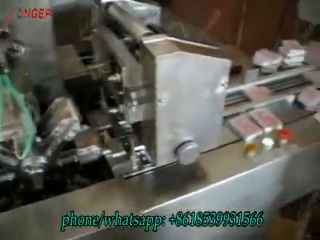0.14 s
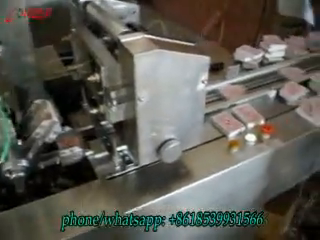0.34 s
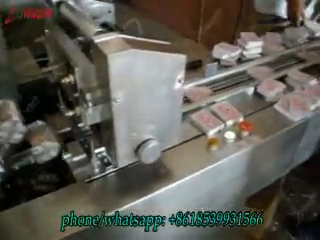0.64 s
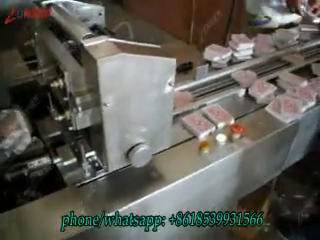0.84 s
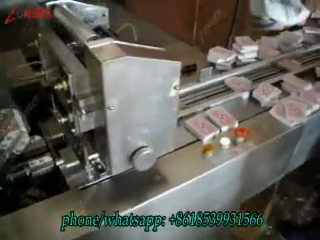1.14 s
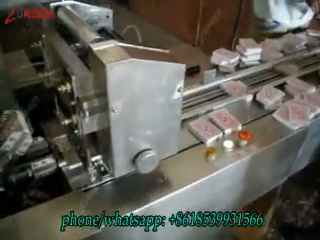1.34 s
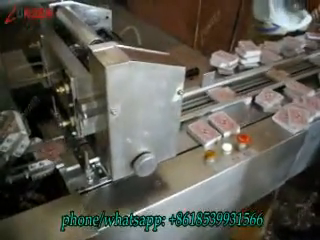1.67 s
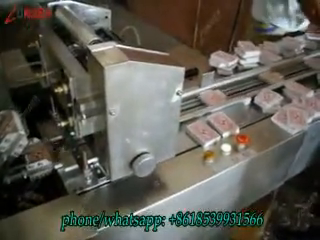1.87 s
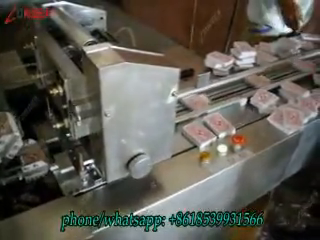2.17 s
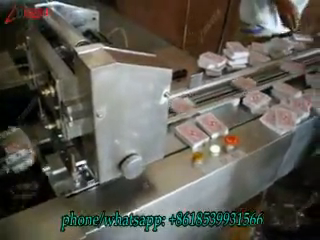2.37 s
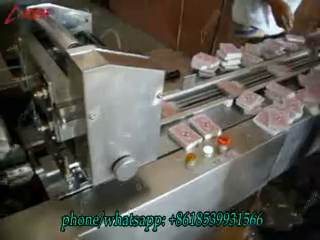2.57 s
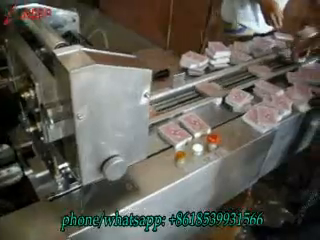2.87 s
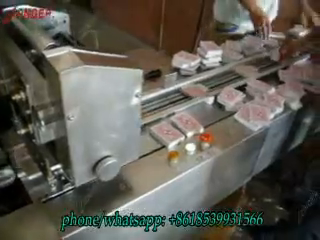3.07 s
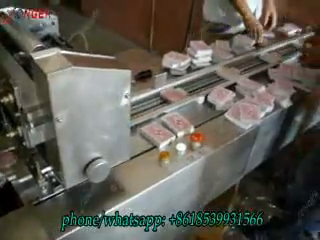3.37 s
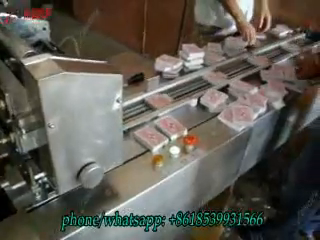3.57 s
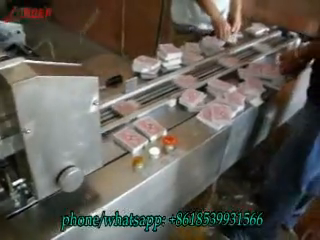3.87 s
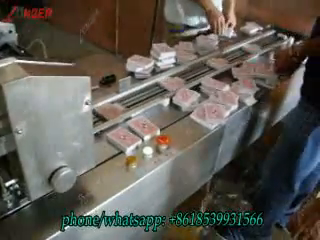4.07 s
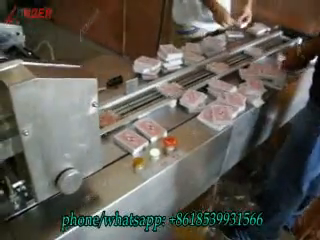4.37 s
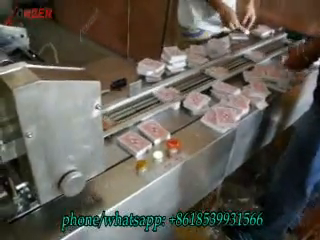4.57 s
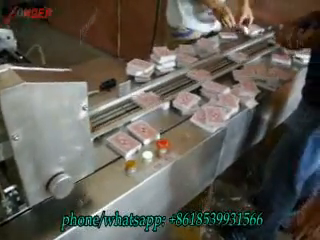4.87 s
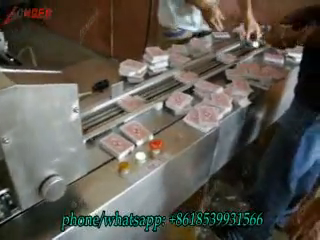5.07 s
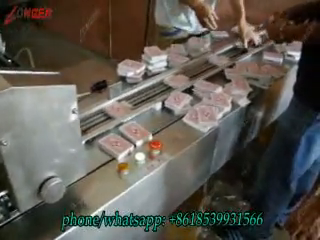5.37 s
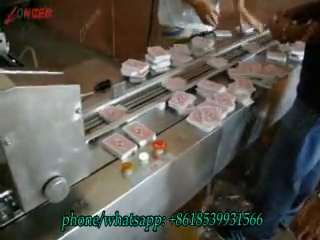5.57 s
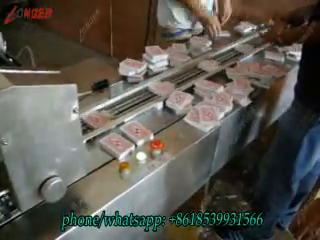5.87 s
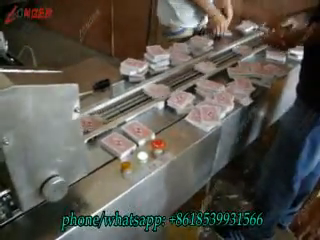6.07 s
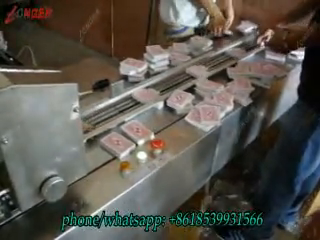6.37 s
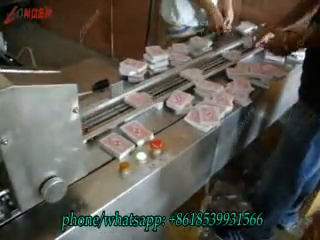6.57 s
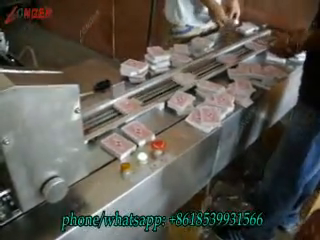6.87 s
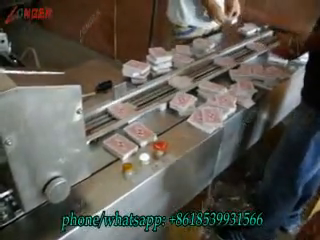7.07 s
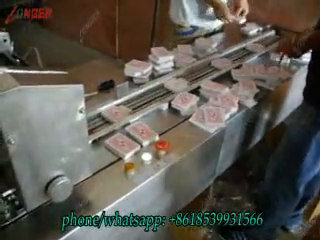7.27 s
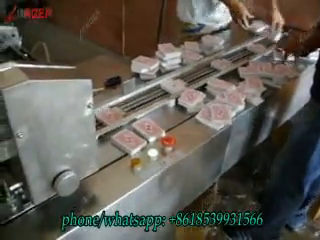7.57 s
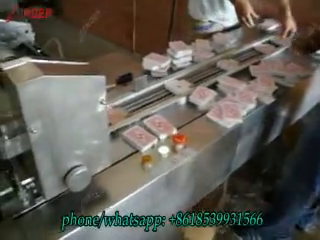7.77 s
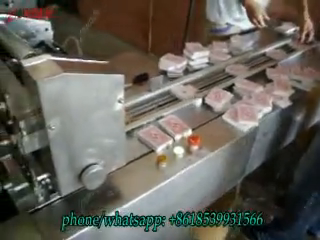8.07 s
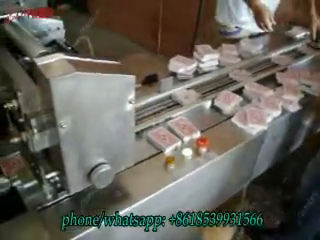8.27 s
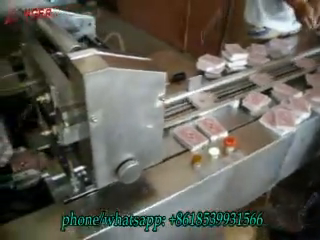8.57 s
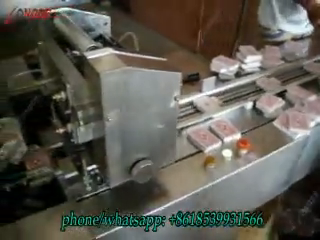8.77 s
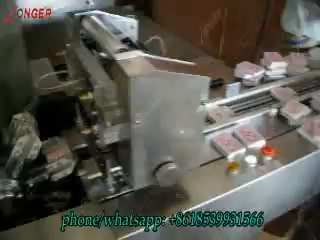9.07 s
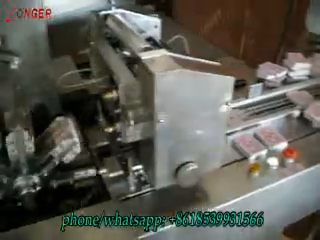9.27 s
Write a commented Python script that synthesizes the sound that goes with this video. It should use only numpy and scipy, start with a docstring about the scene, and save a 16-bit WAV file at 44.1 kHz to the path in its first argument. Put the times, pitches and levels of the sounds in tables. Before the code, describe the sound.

Over a steady motor drone, a card-packing machine ticks, crunches film and clacks in cycles, then loud knocks shake its metal housing.

```python
"""Card-wrapping machine

An automatic machine wraps decks of cards in a workshop, one pack about every 1.7 s. Over the rumble
of the drive and the rattle of the chain, the linkage ticks, film crunches in the jaws and a steel
lever clacks home. Later a heavy knock shakes the sheet-metal housing once a cycle and overloads a
close, narrow-band microphone."""
import sys
import numpy as np
from scipy import signal
from scipy.fft import rfft, irfft, next_fast_len
from scipy.io import wavfile

SR = 44100
rng = np.random.default_rng(int(sys.argv[2]) if len(sys.argv) > 2 else 0)


def generate_wav(sig):
    """Save sig (samples, or channels by samples) to the path in sys.argv[1] as 16-bit PCM at SR."""
    pcm = np.round(np.clip(np.atleast_2d(sig).T, -1, 1) * 32767).astype(np.int16)
    wavfile.write(sys.argv[1], SR, pcm)


N = 416295
TIME = np.arange(N) / SR
AGE = TIME[:SR]  # seconds since a hit; every one-shot lasts 1 s


def undb(db):
    """Decibels to gain."""
    return 10 ** (np.asarray(db) / 20)


def unit(x):
    """Scale to rms 1."""
    return x / np.sqrt(np.mean(x ** 2))


def noise(spectrum, size):
    """Noise shaped by an EQ curve of (Hz, dB) points on a log-frequency axis, rms 1."""
    hz = np.fft.rfftfreq(size, 1 / SR)
    point_hz, point_db = np.transpose(spectrum)
    curve_db = np.interp(np.log(hz + 1e-3), np.log(point_hz), point_db)
    return unit(irfft(rfft(rng.standard_normal(size)) * undb(curve_db), size))


def band(centre_hz, width_hz, size):
    """Noise in one steep-sided resonance, rms 1."""
    hz = np.fft.rfftfreq(size, 1 / SR)
    rolloff = 1 + (2 * (hz - centre_hz) / width_hz) ** 4
    return unit(irfft(rfft(rng.standard_normal(size)) / rolloff, size))


def wander(rate_hz):
    """Random modulation that glides between values with a spread of 1."""
    knots = np.arange(0, TIME[-1] + 1, 1 / rate_hz)
    return np.interp(TIME, knots, rng.standard_normal(1024)[:len(knots)])


def attack(rise_s):
    """Soft onset: vibration takes a moment to spread through a part."""
    return 1 - np.exp(-AGE / rise_s)


def fade(t60):
    """Exponential decay, 60 dB down after t60 seconds."""
    return np.exp(-np.log(1000) * AGE / t60)


def ring(modes, scatter_db, detune):
    """A struck object: decaying sines whose levels and pitches vary from hit to hit."""
    chance = rng.standard_normal((len(modes), 2))
    return sum(undb(db + scatter_db * a) * fade(t60) * np.sin(2 * np.pi * hz * (1 + detune * b) * AGE)
               for (hz, db, t60), (a, b) in zip(modes, chance))


def crackle(per_second, cap_db, size):
    """Random impulses, mostly small with a few strong ones."""
    fires = rng.random(size) < per_second / SR
    return fires * undb(np.minimum(4 * rng.exponential(size=size), cap_db))


def add(track, start, sound):
    """Mix a sound into the track at a time in seconds."""
    i = int(start * SR)
    track[i:i + len(sound)] += sound[:N - i]


# Tone of the running drive: (frequency [Hz], level [dB])
DRIVE_SPECTRUM = [(11, -30), (18, 4.5), (53, -4.5), (71, -7.5), (151, -3.5), (195, -7), (270, -3.5),
                  (382, -9), (429, -8), (482, -8), (900, -11), (1570, -22.5), (2800, -22), (3690, -31),
                  (4550, -37), (5920, -71), (10000, -120)]
# Resonances the drive keeps ringing: (centre [Hz], width [Hz], level [dB])
HUM_BANDS = [(94, 6.6, -52), (157, 26, -46), (436.6, 24, -43), (860, 270, -37), (1093, 200, -41),
             (2320, 640, -49.5)]
# Fader curve of the housing's drone, strongest near the start: (time [s], level [dB])
DRONE_CURVE = [(0, 3), (.7, 10), (1.3, -3.5), (9.4, -1)]


def drive():
    """Motor and gears rumble and whirr in flickering octave bands and keep frame and housing humming."""
    rumble_db, whirr_db = -26.5, -27.5
    size = next_fast_len(N, real=True)
    spectrum = rfft(noise(DRIVE_SPECTRUM, size))
    octave = np.log2(np.fft.rfftfreq(size, 1 / SR) + 1)
    shared_drift_db = 0.24 * wander(8.2)
    motor = np.zeros(N)
    for centre in range(4, 13):
        window = np.maximum(1 - np.abs(octave - centre), 0)
        level_db = rumble_db if 2 ** centre < 200 else whirr_db
        flicker_db = 1.8 * wander(28)
        motor += irfft(spectrum * window, size)[:N] * undb(level_db + shared_drift_db + flicker_db)
    hum = sum(undb(db) * band(hz, width, size)[:N] for hz, width, db in HUM_BANDS)
    drone_db = np.interp(TIME, *np.transpose(DRONE_CURVE)) - 39
    drone = undb(drone_db) * band(315, 87, size)[:N]
    return motor + undb(0.03) * hum + drone


# Bite of a hard contact on steel: (frequency [Hz], level [dB])
CRACK_SPECTRUM = [(150, -11.5), (400, 7.5), (700, -6.5), (1100, 8.5), (1500, -10.5), (2500, -4),
                  (3600, -7.5), (4600, -16)]
# Cue sheet for chain, linkage, film and lever, one row a pack: (clack time [s], clack level [dB],
# film level [dB], first-grip trim [dB], catch lead before the clack [s], catch level [dB])
CYCLES = [(.678, -1, -1.5, 5.5, .611, 1.5), (2.363, 2, 2.5, -0.5, 0.56, -8), (4.047, 0.5, 1, -6, .594, -1),
          (5.736, 0.5, -1, -1.5, .595, 2), (7.431, -2, 2, -4, .599, 0), (9.132, 0.5, -2, 4.5, .612, 3)]


def chain():
    """The conveyor chain rattles over its sprockets in faint clicks that bunch up before each clack."""
    lead_s, spread_s = 0.79, 0.092
    bunching = sum(np.exp(-0.5 * ((TIME - clack + lead_s) / spread_s) ** 2) for clack, *_ in CYCLES)
    clicks_per_s = 26 * undb(5 * wander(3.7) + 8.5 * bunching)
    clicks = crackle(clicks_per_s, cap_db=11, size=N)
    link = (band(3700, 1000, SR) + undb(5.5) * noise(CRACK_SPECTRUM, SR)) * fade(0.09)
    return undb(-45) * unit(signal.fftconvolve(clicks, link)[:N])


def workshop(dry):
    """Nearby steel and the walls add a short, bright wash of reflections."""
    echoes = unit(rng.standard_normal(SR) * fade(0.12) * (AGE > 0.003)) / np.sqrt(SR)
    echoes = signal.sosfilt(signal.butter(2, 1300, "high", fs=SR, output="sos"), echoes)
    return dry + undb(-13.5) * signal.fftconvolve(dry, echoes)[:N]


# Bright ring of the light steel linkage: (frequency [Hz], level [dB], t60 [s])
LINKAGE_MODES = [(2190, 0.5, .1), (2650, 2.5, 0.11), (2860, -1.5, 0.13), (3600, 0, .1), (3660, -3, .12),
                 (4160, -3, .06), (4350, 3, 0.13)]
# Dull thud of the machine bed under a small blow: (frequency [Hz], level [dB])
BED_SPECTRUM = [(80, -12.5), (250, -4.5), (350, -2), (390, -3.5), (435, 3.5), (490, -9), (720, -14.5),
                (1000, -4), (1500, -16), (3000, -44)]


def tick(centre_hz, thud_db):
    """The linkage clicks, rings in the modes near the struck part's pitch and nudges the bed."""
    modes = [(hz, db - abs(hz - centre_hz) / 65, t60) for hz, db, t60 in LINKAGE_MODES]
    steel = undb(-31) * ring(modes, scatter_db=4, detune=0.0052)
    click = undb(-32.5) * band(centre_hz, 600, SR) + undb(-24) * noise(CRACK_SPECTRUM, SR)
    thud = undb(thud_db - 26) * noise(BED_SPECTRUM, SR) * fade(0.45)
    return attack(0.00079) * (steel + click * fade(0.11) + thud)


# Stray ticks of loose links: (time [s], level [dB], ring centre [Hz])
LOOSE_LINKS = [(1.488, -6, 3900), (2.532, 0.5, 2900), (3.185, -2.5, 3400), (3.872, -7, 3600),
               (7.771, -7, 3400), (8.268, 0, 3900), (8.358, -3, 3950), (8.433, -4.5, 3800),
               (9.248, -3, 2600)]


def linkage_ticks():
    """The cam ticks early in the cycle, a catch drops before the jaws close, loose links tick between."""
    cam_lead_s = 1.241
    out = np.zeros(N)
    for clack, *_, catch_lead, catch_db in CYCLES:
        if clack > cam_lead_s:
            add(out, clack - cam_lead_s, undb(-1) * tick(centre_hz=2650, thud_db=-4.5))
        add(out, clack - catch_lead, undb(catch_db) * tick(centre_hz=3440, thud_db=2.5))
    for start, db, centre_hz in LOOSE_LINKS:
        add(out, start, undb(db) * tick(centre_hz, thud_db=-12))
    return out


# Boom of the sheet-metal panels: (frequency [Hz], level [dB], t60 [s])
PANEL_MODES = [(106, -25.5, 0.36), (144, -21.5, 0.99), (184.5, -19, 1.2), (213.5, -15.5, 0.87),
               (260, -7.5, 0.1), (264, -9.5, 0.52), (305, -7.5, 1.1), (309.3, -7, 0.39), (360, -12.5, 1),
               (355.7, -10, 1.3), (360, -6, 0.6), (403.5, -16, 1.2), (451, -18, 1.3), (541, -14.5, 0.95),
               (672, -19.5, 0.11), (879, -19.5, 0.51), (1050, -22.5, 0.59)]
# Low thump of the housing as a whole: (frequency [Hz], level [dB], t60 [s])
THUMP_MODES = [(113.7, -12, 0.3), (180, -16.5, 0.12), (250.7, -1, 0.3), (314, -0.5, .1)]
# Dense ring of the frame: (frequency [Hz], level [dB])
FRAME_SPECTRUM = [(50, -18.5), (170, -11.5), (260, 0.5), (370, 1.5), (480, -7), (720, -14), (1080, -17),
                  (1350, -22.5), (2600, -48), (4500, -51.5)]
# Clatter of loose steel parts: (frequency [Hz], level [dB])
CLATTER_SPECTRUM = [(200, -10.5), (550, 2), (720, -1), (1100, 5), (1400, -13.5), (2000, -14.5), (2700, -16),
                    (3600, -28.5), (4600, -34)]
# Light bumps and heavy knocks: (time [s], level [dB], contact hardness [dB], thump trim [dB])
HOUSING_HITS = [(.25, -23.5, -1, 3), (1.002, -20.5, -8, 6), (3.591, 4.5, 8.5, -2), (5.255, 3, 3.5, 1.5),
                (5.499, -18.5, 15.5, 0), (6.960, -1.5, -7.5, 0.5), (7.171, -19, 14.5, 9.5),
                (8.657, -3.5, -0.5, 0.5)]


def housing_knocks():
    """The struck housing thumps and booms; the harder the contact, the more loose steel clatters."""
    bounce_s, bounce_db = 0.056, -10.5  # the striking part falls back once
    out = np.zeros(N)
    for start, hit_db, hard_db, thump_db in HOUSING_HITS:
        boom = undb(-8) * ring(PANEL_MODES, scatter_db=2.3, detune=0.0022) * attack(0.0046)
        frame_tail = undb(-11) * noise(FRAME_SPECTRUM, SR) * fade(0.93)
        clatter_tail = undb(hard_db / 2 - 21) * noise(CLATTER_SPECTRUM, SR) * fade(0.88)
        add(out, start, undb(hit_db) * (boom + attack(0.0011) * (frame_tail + clatter_tail)))
        for delay, contact_db in ((0, 0), (bounce_s, bounce_db)):
            thump = undb(thump_db - 10) * ring(THUMP_MODES, scatter_db=4, detune=0.0093)
            frame = undb(-1) * noise(FRAME_SPECTRUM, SR) * fade(0.059)
            clatter = undb(hard_db - 13.5) * noise(CLATTER_SPECTRUM, SR) * fade(0.15)
            impact = attack(0.00079) * (thump + frame + clatter)
            add(out, start + delay, undb(hit_db + contact_db) * impact)
    return out


# Short ring of one snap of film: (frequency [Hz], level [dB], t60 [s])
SNAP_MODES = [(1960, -4.5, 0.0054), (2333, 0, 0.035), (2570, -15.5, 0.017), (3610, -4, 0.012)]
# Tone of crumpling film: (frequency [Hz], level [dB])
FILM_SPECTRUM = [(300, -11), (950, 4), (1550, -20), (2000, -4), (2450, 2), (3000, -2), (3600, -7),
                 (4600, -19)]


def crunch(length_s, snap_db):
    """Film gives way with one snap and a burst of tiny ones, while the jaws load the bed."""
    snaps = crackle(per_second=450, cap_db=12, size=SR) * (AGE < length_s)
    snaps[0] = 3  # the burst opens on a strong snap
    snap_energy = fade(0.0082) ** 2 + undb(-28) * fade(0.28) ** 2
    energy = signal.fftconvolve(snaps ** 2, snap_energy)[:SR]
    envelope = np.sqrt(np.abs(energy) / np.mean(energy[:int(length_s * SR) + 1]))
    first_snap = undb(snap_db - 21.5) * ring(SNAP_MODES, scatter_db=7.5, detune=0.011)
    crumple = undb(-28.5) * noise(FILM_SPECTRUM, SR) * envelope
    thud = undb(-27) * noise(BED_SPECTRUM, SR) * fade(0.75)
    return first_snap + crumple + thud


# Grip, squeeze, break, release: (lead before the clack [s], level [dB], length [s], snap trim [dB])
JAW_STAGES = [(.159, 0, .024, -6), (.12, 0.5, .009, -8), (.105, 4, 0.013, -3.5), (.072, -4, .009, -4)]


def film_crunches():
    """The jaws work the film in four quick crunches before each clack; the first grip varies most."""
    out = np.zeros(N)
    for clack, _, film_db, grip_db, *_ in CYCLES:
        for stage, (lead_s, stage_db, length_s, snap_db) in enumerate(JAW_STAGES):
            level_db = film_db + stage_db + (grip_db if stage == 0 else 0)
            add(out, clack - lead_s, undb(level_db) * crunch(length_s, snap_db))
    return out


# Steely ring of the lever, centred near 1.1 kHz: (frequency [Hz], level [dB], t60 [s])
LEVER_MODES = [(997, -14, 0.31), (1085, -13, 0.037), (1098, -16.5, 0.24), (1106, -3.5, 0.26),
               (1140, -15, 0.55), (1480, -21.5, 0.21), (2144, -22.5, 0.15), (3100, -49.5, .15),
               (3540, -27, 0.071)]
# Low body from the lever's bracket: (frequency [Hz], level [dB], t60 [s])
BRACKET_MODES = [(96.4, -24, 0.5), (340.2, -9.5, 0.24), (359.2, -14, 0.31), (421.5, -12, 0.13),
                 (424, -15, 0.4)]


def lever_clacks():
    """The lever hits its stop and rings almost alike each cycle; its bracket and the room answer."""
    out = np.zeros(N)
    for start, clack_db, *_ in CYCLES:
        steel = undb(-6.5) * ring(LEVER_MODES, scatter_db=0.5, detune=0.0011) * attack(0.0026)
        bracket = undb(-6) * ring(BRACKET_MODES, scatter_db=0.5, detune=0.0018) * attack(0.0027)
        crack = undb(-14.5) * noise(CRACK_SPECTRUM, SR) * fade(0.08) * attack(0.0006)
        room = undb(-23.5) * noise(CRACK_SPECTRUM, SR) * fade(0.48)
        add(out, start, undb(clack_db) * (steel + bracket + crack + room))
    return out


def scene():
    """Mono mix: drive and chain in the workshop, with the hits on top."""
    background = workshop(drive() + chain())
    return (background + linkage_ticks() + film_crunches() + lever_clacks() + housing_knocks())[None]


def overload(x, ceiling, knee):
    """Pass small signals unchanged and flatten peaks at the ceiling; a higher knee clips harder."""
    return x / (1 + np.abs(x / ceiling) ** knee) ** (1 / knee)


def record(dry):
    """The microphone overloads and loses the treble; the next stage shaves the highest crests."""
    mic_top_hz, output_top_hz = 4650, 15700
    clipped = overload(dry, ceiling=0.785, knee=12)
    dulled = signal.sosfilt(signal.butter(4, 3900, fs=SR, output="sos"), clipped)
    narrow = signal.sosfilt(signal.ellip(8, 0.2, 80, mic_top_hz, fs=SR, output="sos"), dulled)
    shaved = overload(narrow, ceiling=0.77, knee=24)
    return signal.sosfilt(signal.ellip(8, 0.2, 70, output_top_hz, fs=SR, output="sos"), shaved)


dry = scene()
out = record(dry)
generate_wav(out)
```